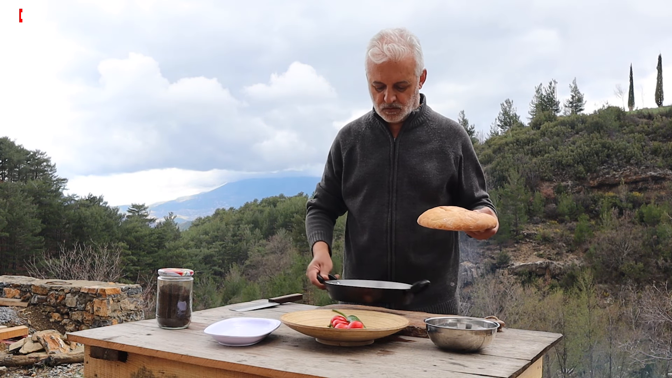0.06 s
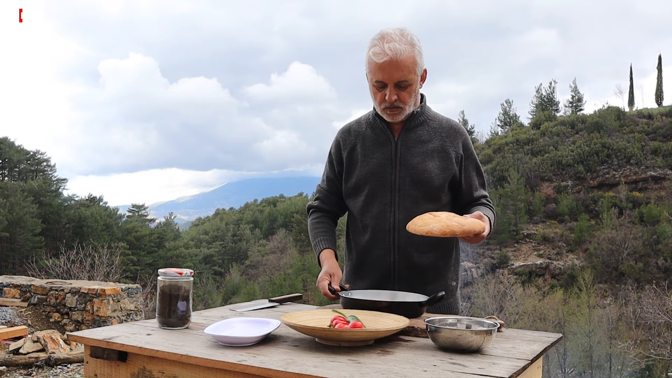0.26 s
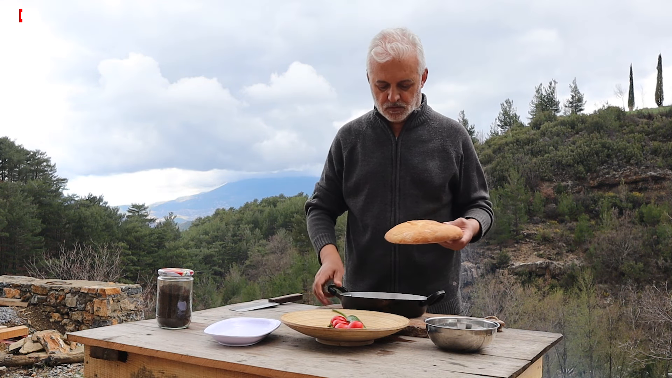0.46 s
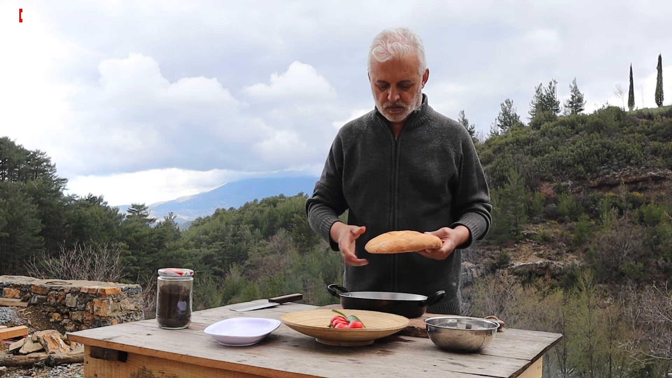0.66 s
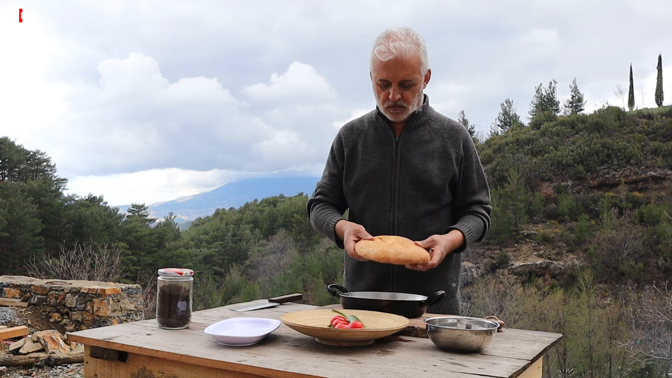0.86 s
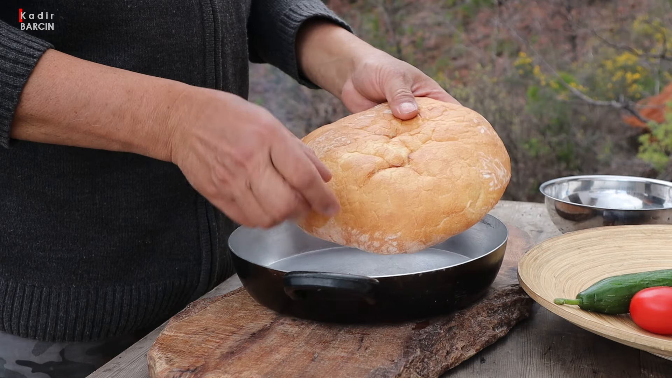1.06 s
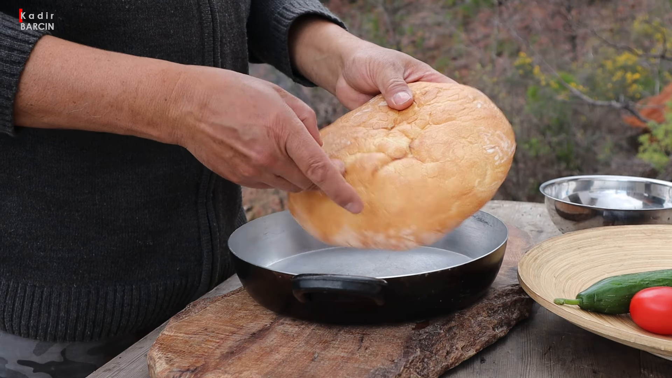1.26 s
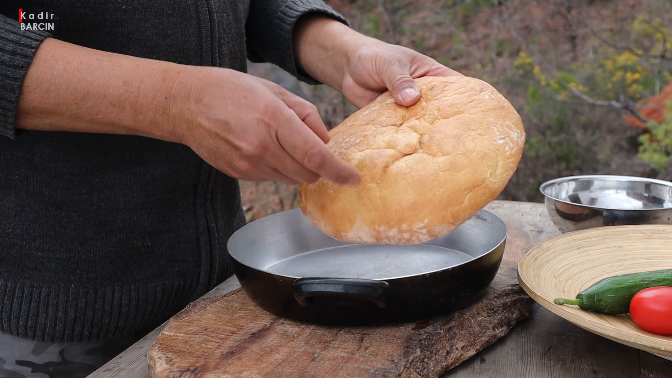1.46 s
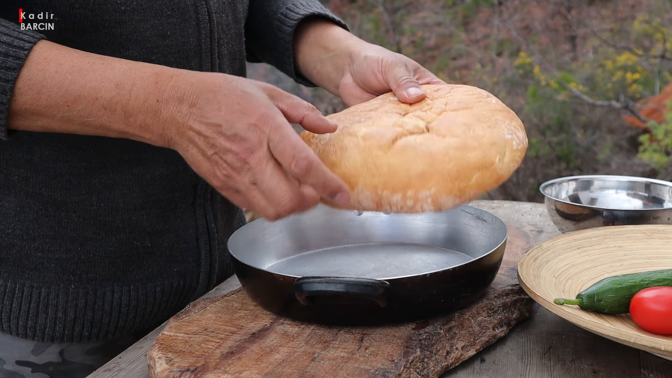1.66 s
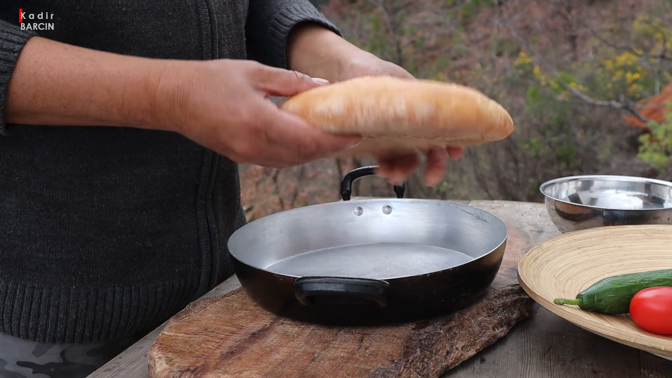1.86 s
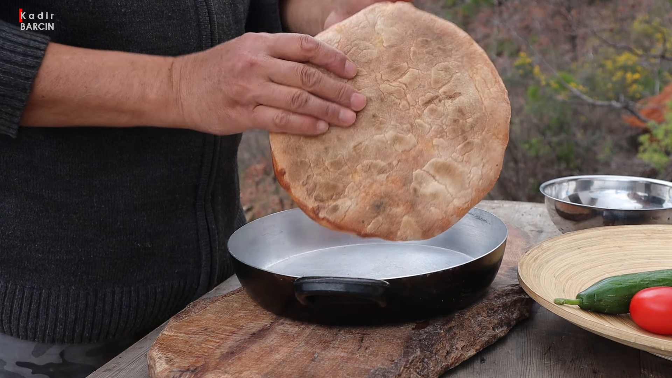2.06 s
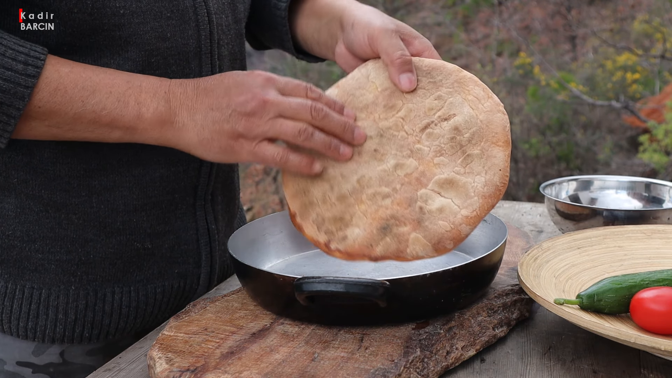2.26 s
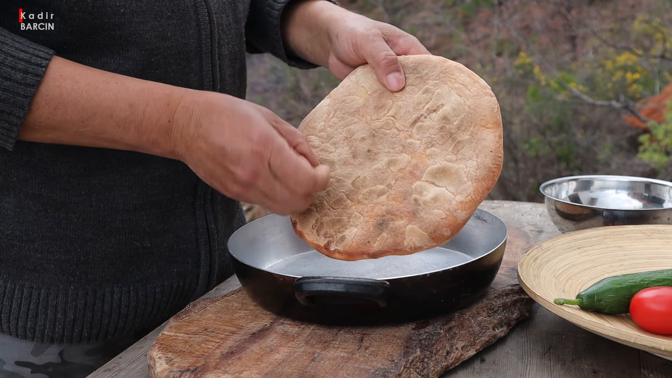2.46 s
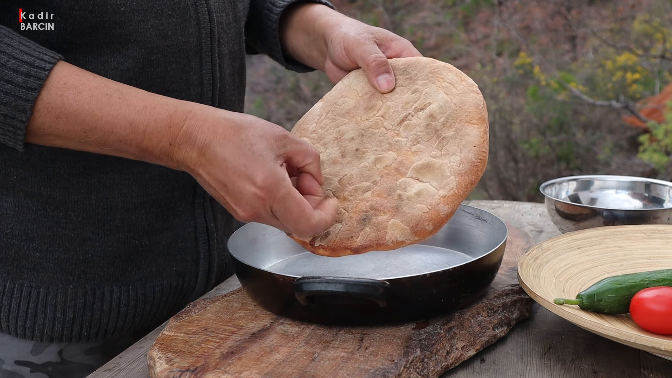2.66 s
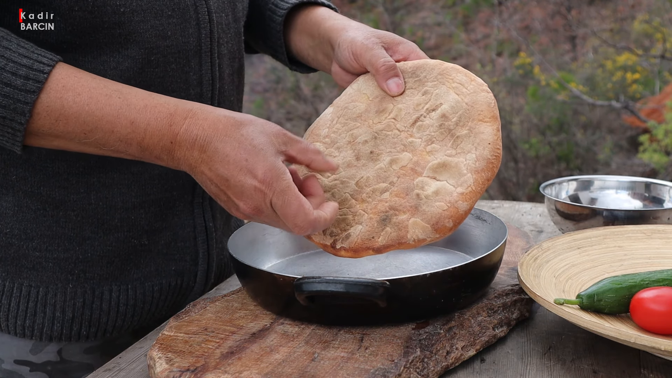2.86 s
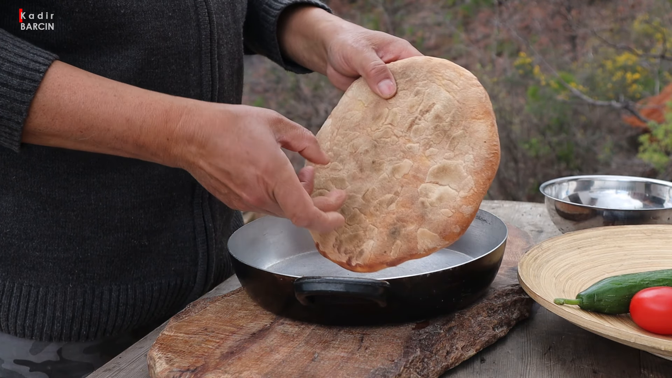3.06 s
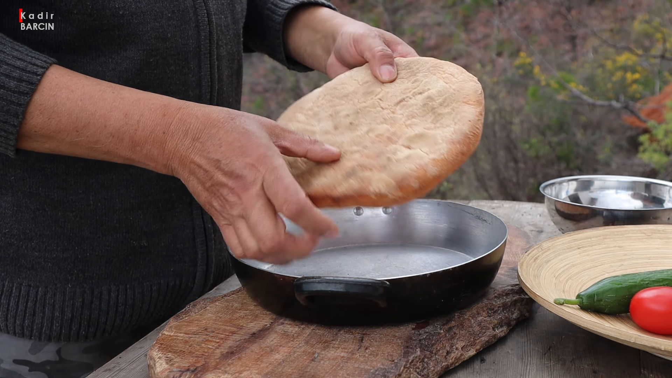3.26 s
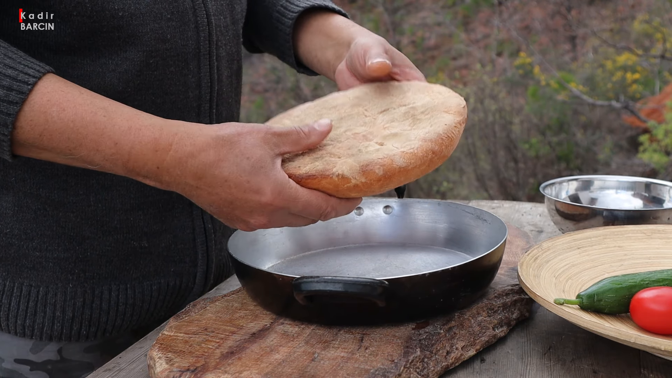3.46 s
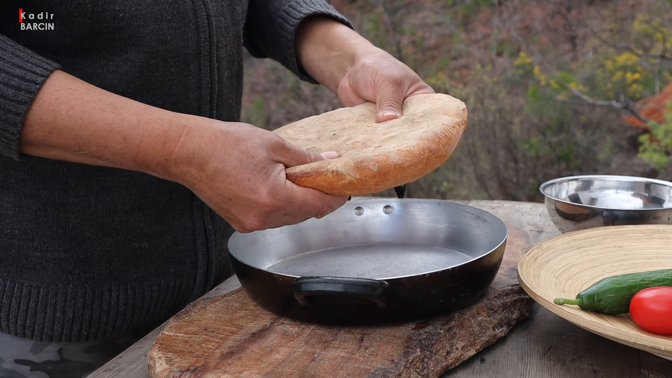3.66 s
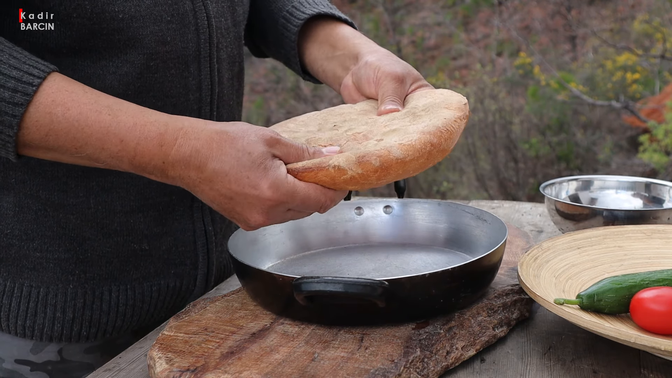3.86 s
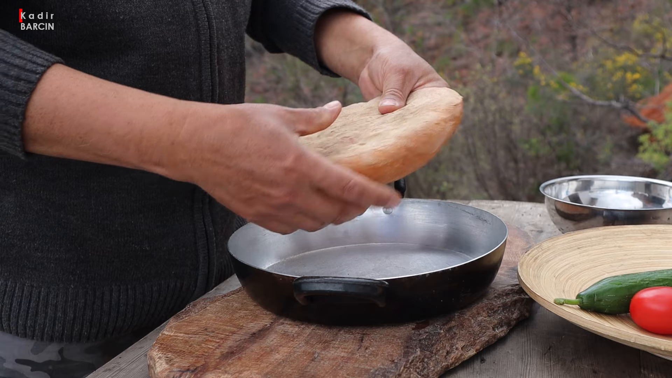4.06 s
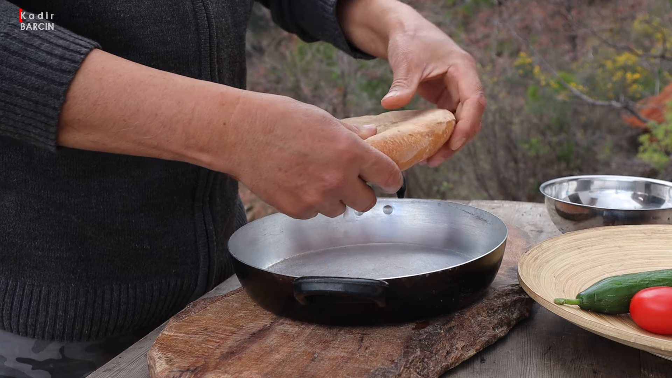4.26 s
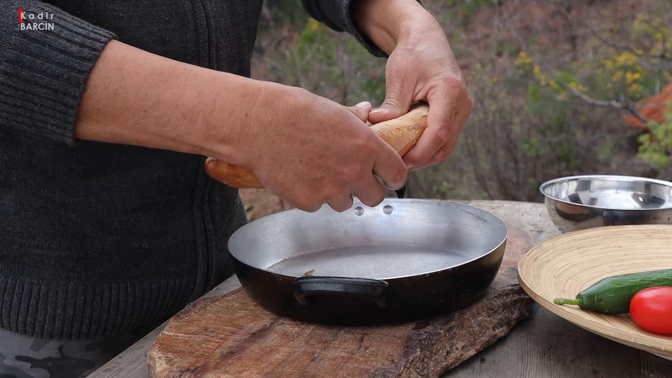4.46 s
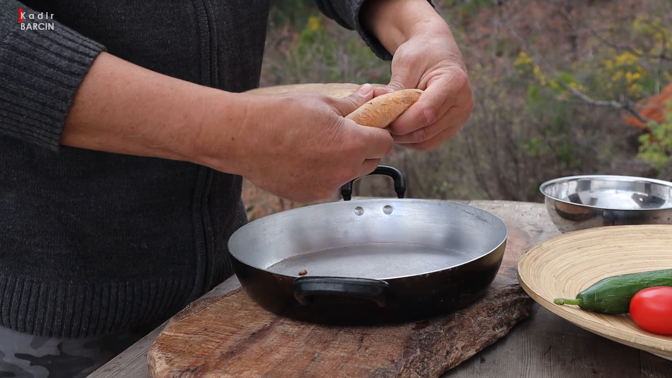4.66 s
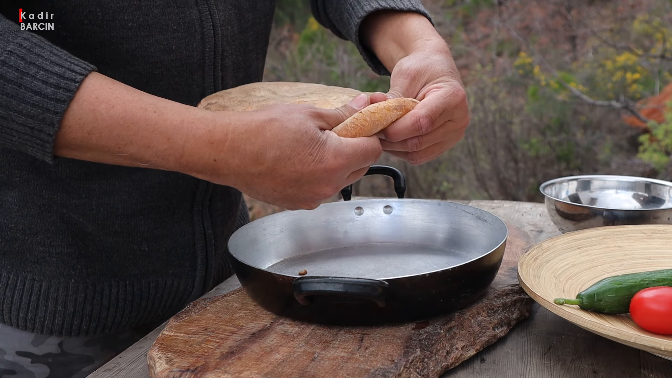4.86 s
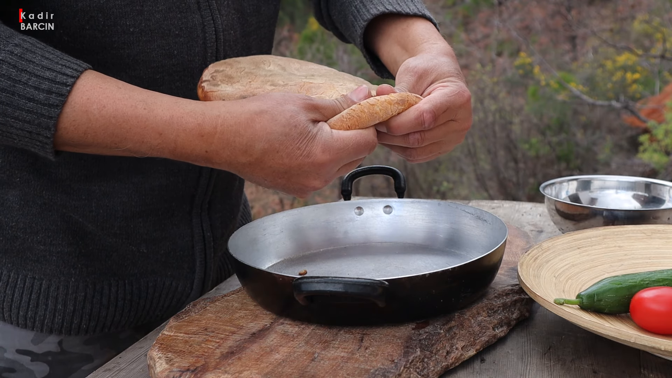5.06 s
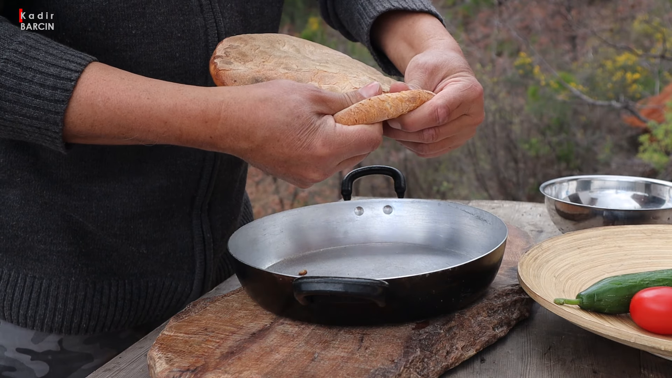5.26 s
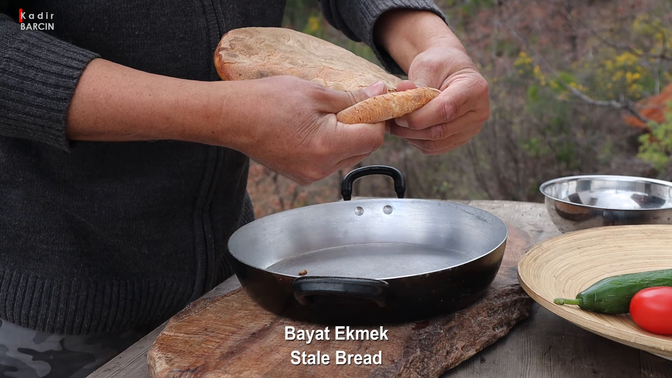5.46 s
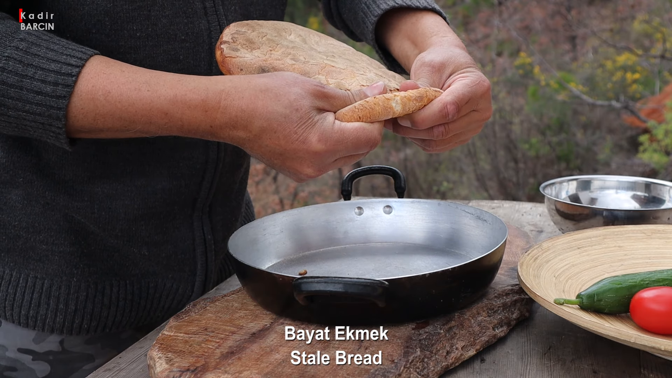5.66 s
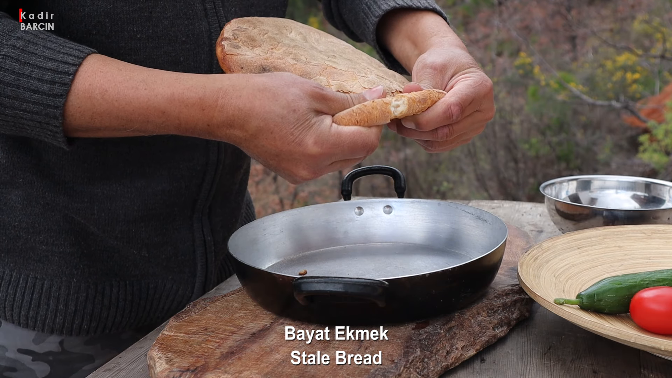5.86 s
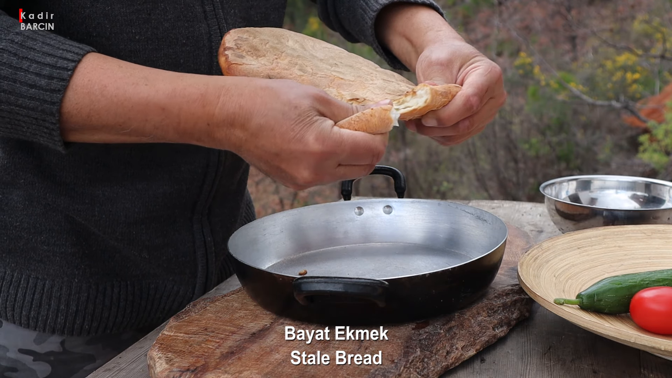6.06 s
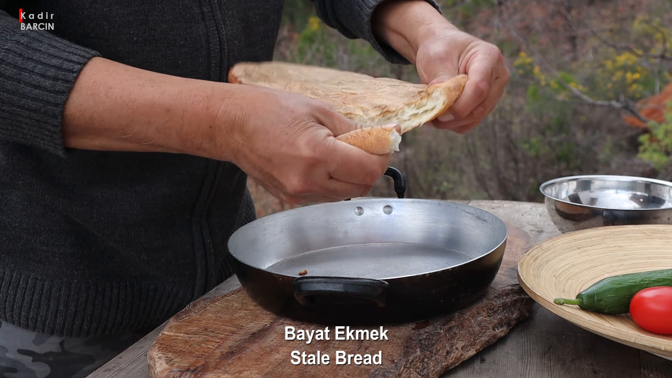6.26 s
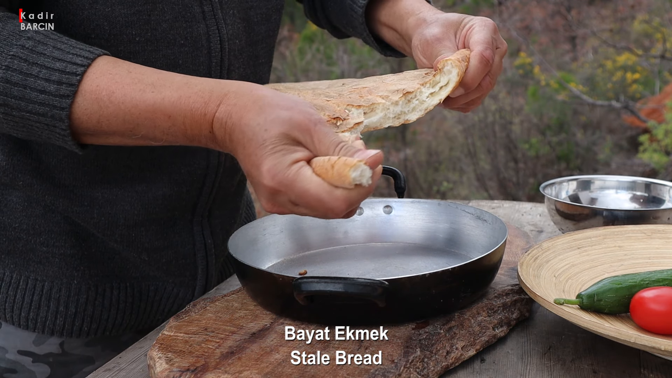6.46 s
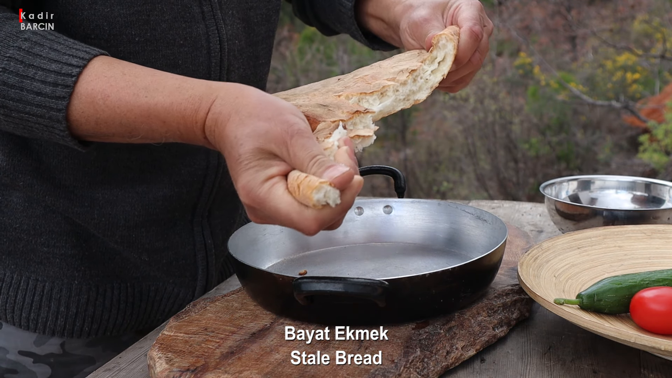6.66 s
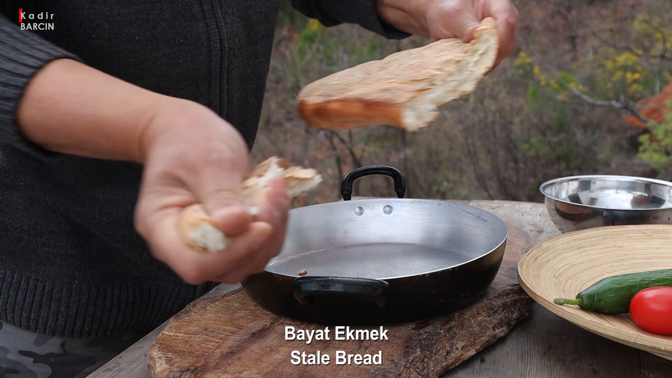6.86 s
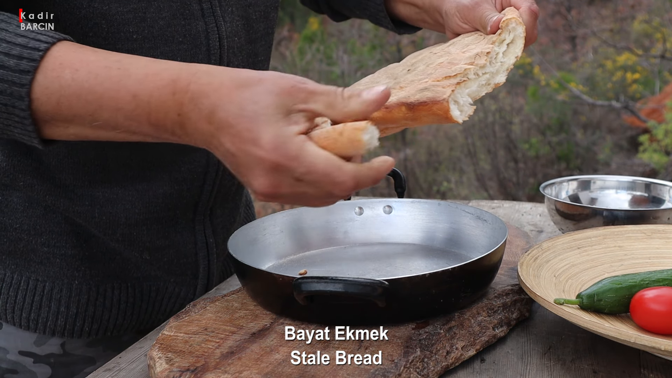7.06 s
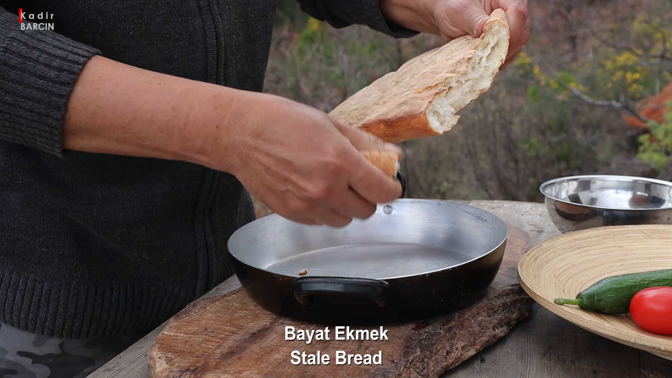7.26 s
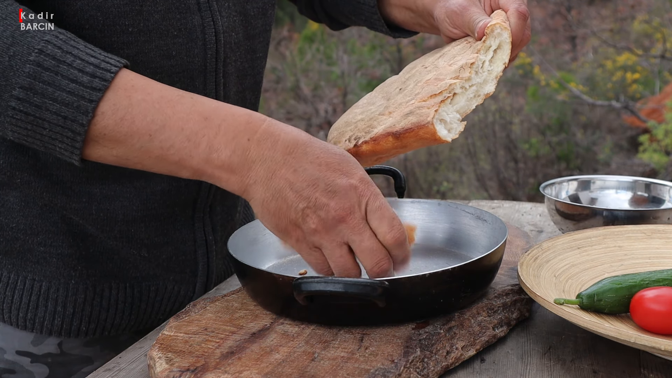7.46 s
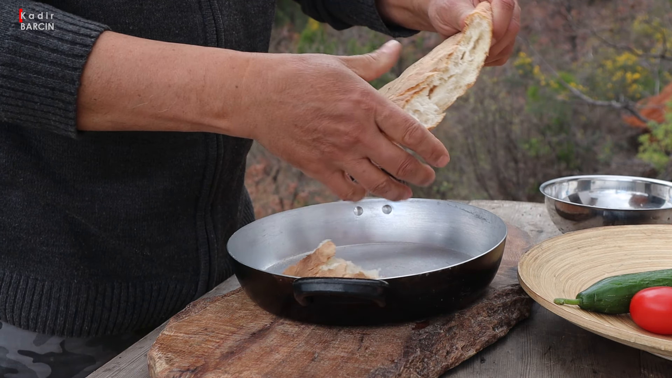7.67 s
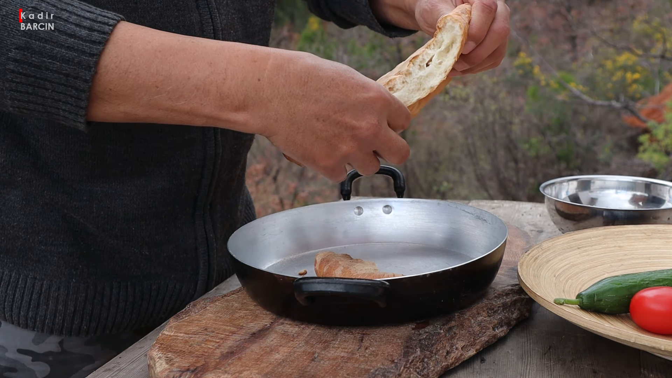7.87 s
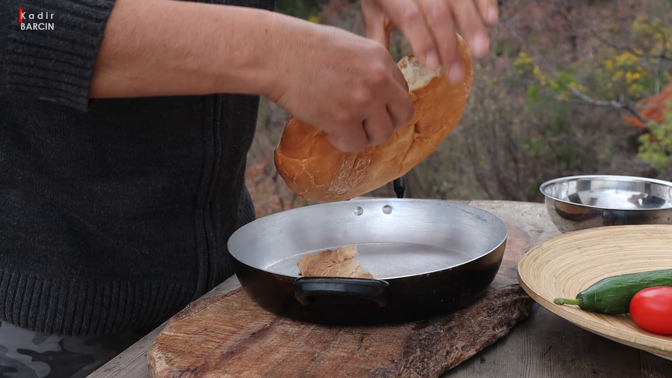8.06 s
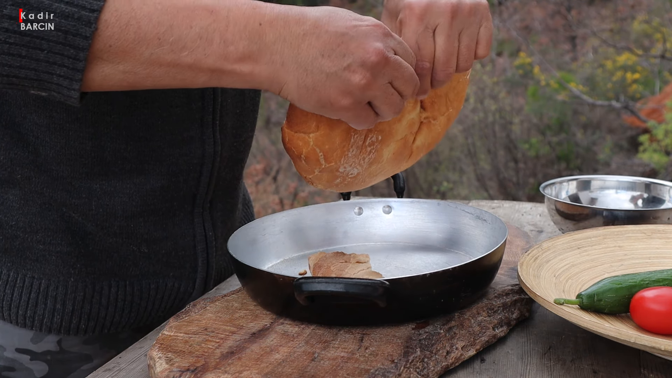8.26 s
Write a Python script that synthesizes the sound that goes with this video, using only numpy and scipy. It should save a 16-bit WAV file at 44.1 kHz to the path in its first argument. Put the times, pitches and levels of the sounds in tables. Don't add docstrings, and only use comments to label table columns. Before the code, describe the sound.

A pan lands with a short dull metallic clunk. Hollow thumping knocks on a hard-crusted loaf follow, with dry skin rubbing between them. The grip tightens into sharp little cracks, then a gritty, crackling tear. A bread chunk hits the metal pan, bounces and settles with a short ring, before light handling. Close, dry microphone in open air with faint steady wind and sparse distant chirps.

```python
import sys
import numpy as np
from scipy import signal
from scipy.io import wavfile
from scipy.ndimage import uniform_filter1d

SR = 44100
rng = np.random.default_rng(int(sys.argv[2]) if len(sys.argv) > 2 else 0)


def store_wav(level_fs):
    pcm = np.round(np.clip(np.atleast_2d(level_fs), -1, 1) * 32767)
    wavfile.write(sys.argv[1], SR, pcm.T.astype(np.int16))


def rack_gain(trim_db):
    fader = np.asarray(trim_db, float)
    return 10 ** (fader / 20)


N = 366471

# frequency_hz, level_db
CRUMB_SPECTRUM = [(200, -33.5), (500, 8.5), (1200, 9), (2500, 11.5), (4500, 9.5), (7000, -25)]


def evened(x):
    return x / np.sqrt(np.mean(x ** 2) + 1e-20)


def peaked(x):
    return x / abs(x).max()


def curves(rows):
    s, *columns = np.transpose(rows)
    return [np.interp(np.arange(N) / SR, s, c) for c in columns]


def read(points, hz):
    f, value = np.transpose(points)
    return np.interp(np.log(hz + 1), np.log(f + 1), value)


def coloured(x, points):
    level_db = np.maximum(read(points, abs(np.fft.fftfreq(4096, 1 / SR))), -100)
    log_gain = np.log(rack_gain(level_db))
    taps = np.fft.ifft(np.exp(np.conj(signal.hilbert(log_gain)))).real[:2048]
    return signal.oaconvolve(x, taps)[:len(x)]


def resonate(x, hz, width):
    r = np.exp(-np.pi * width / SR)
    return 2 * signal.lfilter([1 - r], [1, -r * np.exp(2j * np.pi * hz / SR)], x).real


def add(mix, s, sound):
    part = mix[round(s * SR):][:len(sound)]
    part += sound[:len(part)]


def swells(rows):
    t = np.arange(0, N + 32, 32) / SR
    peak, rise, fall, db = np.transpose(rows)[:4, :, None]
    away = np.maximum((peak - t) / rise, (t - peak) / fall)
    return rack_gain(db - 17.5 * away ** 1.22) ** 2


def stretched(x):
    return np.interp(np.arange(N) / 32, np.arange(len(x)), x)


def tick(t60, hz, noise, broad_db):
    # frequency_hz, level_db
    snap_spectrum = [(1500, -48), (3000, -5), (5000, -8.5), (7000, -6.5), (8300, -2), (10200, -19.5),
                     (13400, -11), (15500, -19), (17000, -45)]
    burst = noise * rack_gain(-60 * np.arange(len(noise)) / SR / max(t60, .002))
    burst[0] -= 5.0
    broad = rack_gain(broad_db) * coloured(burst, snap_spectrum)
    return peaked(broad + resonate(burst, hz, 0.089 * hz))


def knocks():
    # start_s, click_db, thump_db, thump_t60_s, contact_time_factor
    knuckles = [
        (0.859, -46, -32.5, 0.038, 1.2),
        (1.3535, 2.5, 4, 0.017, 0.93),
        (1.622, -16.5, -8.5, 0.037, 1.5),
        (1.8836, -24, -21.5, 0.027, 1.05),
        (2.789, -6, 2.5, 0.023, 1.45),
        (3.0831, -26, -15.5, .021, 1),
        (3.1015, -11.5, -5, 0.036, 1.3),
        (3.491, -32, -25.5, 0.034, 1.3),
    ]
    # second_touch_ms, second_touch_db, crust_ring_db, overtones_db
    landings = [
        (.51, -6, -8, -21),
        (.47, -10, -15, -21),
        (1, -10, -1.5, -22),
        (0.64, -6, -12, -22),
        (.6, 5, 8.5, -16),
        (0.4, -4, 1, -21),
        (-0.13, 1, -1.5, -18),
        (0.52, -6, -12, -18),
    ]
    # start_s, click_db, thump_db, thump_hz
    fingers = [
        (1.6071, -22, -13, 233),
        (1.6116, -38, -15, 163),
        (2.1306, -48, -25, 149),
        (2.1353, -33, -22.5, 260),
        (3.0903, -43, -24, 330),
        (3.0988, -45, -16, 150),
        (3.864, -44, -26, 151),
        (4.243, -45, -26.5, 142),
        (6.8755, -19, -20, 290),
    ]
    # second_touch_ms, second_touch_db, crust_ring_db, overtones_db
    finger_landing = (1, 4, -9, -22)
    # frequency_hz, level_db, t60_s
    loaf_modes = [(570, -15.5, 0.018), (1080, -15, 0.027), (1820, -24, 0.019), (2230, -13, 0.019),
                  (3650, 1, 0.0068), (4540, 3, 0.0038)]
    knuckle_hz, finger_t60_s, finger_pad = 185.6, 0.021, 1.3
    crust_hz, crust_t60_s, rebound_s = 8600, 0.0022, .00009

    out, t = np.zeros(N), np.arange(4000) / SR
    contact_t = t[:600]
    rows = [(*row, knuckle_hz, *land) for row, land in zip(knuckles, landings)]
    rows += [(*row[:3], finger_t60_s, finger_pad, row[3], *finger_landing) for row in fingers]
    overtones = sum(rack_gain(db - 60 * t / t60) * np.sin(2 * np.pi * hz * t) for hz, db, t60 in loaf_modes)
    ring = rack_gain(-60 * contact_t / crust_t60_s) * np.sin(2 * np.pi * crust_hz * contact_t)
    rebound = np.exp(-contact_t / rebound_s)
    for row, noise in zip(sorted(rows), rng.standard_normal((len(rows), 600))):
        s, click_db, thump_db, t60, pad, hz, gap_ms, second_db, ring_db, over_db = row
        turns = hz * t + 0.51 * (1 - np.exp(-t / (0.00057 * pad))) + 0.13 * (1 - np.exp(-t / 0.0034))
        onset = 1 - np.exp(-t / (.00006 * rack_gain(-.6 * thump_db)))
        decay = rack_gain(-60 * t / t60) + rack_gain(-61.0 - 60 * t / 0.062)
        thump = np.sin(2 * np.pi * turns + 0.31) * onset * decay
        slap = np.exp(-contact_t / (0.00025 * pad)) * (1 + 0.7 * noise)
        second = rack_gain(ring_db) * ring + rack_gain(second_db) * rebound
        second += 0.17 * tick(0.019, 14300, noise[::-1], 3.6)
        add(out, s, rack_gain(thump_db) * (thump + rack_gain(over_db) * overtones))
        add(out, s, rack_gain(click_db) * peaked(coloured(slap, CRUMB_SPECTRUM)))
        add(out, s + gap_ms / 1000, rack_gain(click_db) * second)
    return out


def cracks():
    # start_s, peak_db, ring_hz, crumb_share_db, t60_s
    grip_cracks = [(1.7567, -32, 3280, -14, 0.007), (4.2492, -30, 7750, -15, 0.0095),
                   (4.2887, -30, 7190, -2, .012), (4.4231, -19.5, 4800, -10, 0.022),
                   (4.4258, -19.5, 3300, -7, 0.011), (4.4332, -28, 8500, -12, .004),
                   (4.4232, -12, 8000, -14, .004), (4.512, -45, 3280, -5, 0.0064),
                   (4.521, -27, 8000, -16, .0055), (4.7106, -31, 4010, -6, 0.0079),
                   (8.2896, -34, 4070, -12, .007)]
    # start_s, peak_db, ring_hz, crumb_share_db
    tear_cracks = [(5.8607, -25, 5500, -22), (5.8666, -25.5, 5430, -19), (5.9123, -35, 3500, -12),
                   (5.9514, -31, 5460, -19), (5.9569, -29, 3440, -18), (5.96, -30, 3470, -11),
                   (5.9788, -25, 3620, -3.5), (5.9812, -30, 5500, -8), (6.0065, -36, 5000, -6),
                   (6.488, -38, 7800, -12), (6.5345, -38, 8000, -14), (6.675, -36, 8500, -12),
                   (5.995, -21, 4560, -13), (6.019, -42, 4800, -4), (6.03, -29, 4770, -9),
                   (6.2058, -40, 3650, -7), (6.221, -39, 7600, -4), (6.225, -33, 3270, 2),
                   (6.2349, -24, 5030, -12), (6.26, -39, 3100, -1), (6.2824, -37, 13000, -12),
                   (6.4769, -35, 3060, -12), (6.5055, -35, 12000, -12), (6.5301, -36, 8400, -14),
                   (6.547, -29, 8140, -14), (6.5596, -37, 8130, -12), (6.583, -36, 7420, -10),
                   (6.6, -33, 3210, -12), (6.61, -24, 13900, -16), (6.6182, -29, 8000, -6),
                   (6.635, -28, 3420, -11), (6.642, -31, 12500, -8), (6.658, -22, 6160, -14),
                   (6.698, -32, 13000, -12), (6.703, -34, 3570, -10), (6.809, -38, 11000, -12),
                   (6.8165, -30, 7790, -12), (6.844, -25, 7860, -20), (6.866, -25, 3080, -3),
                   (6.872, -30, 5000, 4), (6.873, -22, 3290, 1.5), (6.9436, -35, 8500, -15)]
    tear_t60_s, broad_db, delay_s = .0045, 1.5, .0006

    out, t = np.zeros(N), np.arange(2000) / SR
    rows = sorted(grip_cracks + [(*row, tear_t60_s) for row in tear_cracks])
    for (s, db, hz, body_db, t60), noise in zip(rows, rng.standard_normal((len(rows), 2000))):
        jolt = noise[::-1] * rack_gain(-60 * t / (2.3 * min(t60, .012)))
        add(out, s + delay_s, rack_gain(db) * tick(t60, hz, noise, broad_db))
        add(out, s + delay_s, rack_gain(db + body_db) * peaked(coloured(jolt, CRUMB_SPECTRUM)))
    return out


def rub():
    # peak_s, rise_s, fall_s, rustle_db, low_share_db
    palms = [(.832, 0.012, .04, -53, -10), (.982, 0.052, 0.014, -52.5, 1), (1.196, .05, .02, -58, -8),
             (1.33, .25, .02, -63, -8), (1.86, .015, 0.12, -48, 2), (1.95, 0.13, 0.021, -46, 1.5),
             (2.132, .035, 0.13, -52, -18), (2.31, 0.17, 0.2, -52.5, 2), (3.388, 0.023, 0.018, -44, -4),
             (3.488, .09, 0.15, -52.5, 2), (3.612, .014, .055, -49.5, 3.5), (3.834, 0.04, .015, -45, 0.5),
             (3.894, .06, .03, -55, 2), (4.048, 0.031, 0.079, -48, -13), (4.176, 0.018, 0.097, -46.5, 2),
             (4.255, .025, 0.2, -49.5, 1), (4.515, 0.12, 0.18, -50.5, 3.5), (8.02, 0.052, 0.029, -46.5, 7),
             (8.212, .025, .04, -50.5, 0.5), (8.29, 0.1, .1, -53.5, 2.5)]
    # peak_s, rise_s, fall_s, rustle_db, low_share_db
    skids = [
        (1.386, 0.025, .01, -51, -11),
        (1.624, 0.0033, 0.022, -41.5, -9),
        (2.818, 0.038, 0.028, -50, -14),
        (3.1, 0.0039, 0.014, -32, -9),
        (4.433, 0.005, 0.046, -39, 0.5),
    ]
    # peak_s, rise_s, fall_s, rustle_db, low_share_db
    tears = [(4.894, .018, 0.037, -56, -6), (4.954, .016, 0.091, -55, -10), (5.866, .014, .009, -49, -6),
             (5.85, 0.11, .02, -56, -4), (5.962, .014, 0.067, -44.5, -9), (6.025, 0.12, 0.063, -47.5, 2),
             (6.226, 0.03, 0.072, -48, 6), (6.285, 0.12, 0.037, -47, 1), (6.4, .008, .025, -52, -8),
             (6.54, 0.15, .12, -51.5, -2), (6.65, 0.13, 0.092, -45.5, 1), (6.818, 0.043, 0.018, -49, 1),
             (6.873, 0.044, .008, -40, -2.5), (6.946, .009, .006, -48.5, -1),
             (7.332, .03, 0.17, -58.5, -12), (7.474, .013, 0.018, -50.5, -11)]
    # frequency_hz, level_db
    skin_spectrum = [(1500, -26), (3000, 5), (5000, 1.5), (7000, 1), (8300, 4.5), (10200, -7.5),
                     (13400, -1.5), (15500, -13), (17000, -10)]
    # frequency_hz, level_db
    torn_spectrum = [(1500, -27), (3000, -1.5), (4800, 3), (6500, -1), (8300, 2), (10200, -8), (13400, -1),
                     (15500, -11), (17000, -15)]
    palm_grain, skid_grain, tear_grain = .45, .35, .75

    rows = palms + skids + tears
    power, rest = swells(rows), rack_gain(-69.0) ** 2
    level = np.sqrt(power.sum(0) + rest)
    low = np.sqrt(rack_gain(np.transpose(rows)[4]) ** 2 @ power + rest / 6)
    shares = np.repeat([palm_grain, skid_grain, tear_grain], [len(palms), len(skids), len(tears)])
    grainy = np.clip(stretched((shares @ power + palm_grain * rest) / level ** 2), 0, 1)
    hiss, size, clump = rng.standard_normal((3, N))
    clump = evened(uniform_filter1d(uniform_filter1d(clump, 170), 120))
    fractured = rng.random(N) < 1500 / SR * rack_gain(2.5 * clump)
    grains = fractured * rack_gain(5.0 * abs(size))
    grain_decay = rack_gain(-60 * np.arange(200) / SR / 0.0015)
    grains = hiss[::-1] * signal.oaconvolve(grains, grain_decay)[:N]
    smooth = (1 - grainy) * hiss * rack_gain(2.0 * clump)
    broken = grainy * evened(grains)
    high = coloured(smooth, skin_spectrum) + coloured(broken, torn_spectrum)
    shaken = coloured(smooth + broken, CRUMB_SPECTRUM)
    return rack_gain(2.5) * (stretched(level) * evened(high) + stretched(low) * evened(shaken))


def groans():
    # peak_s, rise_s, fall_s, level_db
    squeezes = [
        (4.48, 0.087, 0.027, -43.5),
        (4.515, 0.0084, 0.05, -40.5),
        (6.02, 0.023, 0.04, -45),
        (6.24, 0.036, 0.034, -39.5),
        (8.25, 0.029, 0.04, -39.5),
    ]
    hz, width_hz = 476, 530
    body = resonate(resonate(rng.standard_normal(N), hz, width_hz), hz, width_hz)
    return stretched(np.sqrt(swells(squeezes).sum(0))) * evened(body)


def pan(blows, modes, tick_hz, broad_db, settle_s, pair):
    out, t = np.zeros(N), np.arange(SR // 2) / SR
    hz, db, t60 = np.transpose(modes)[:, :, None]
    partner = pair * np.sin(2 * np.pi * (hz * 1.006 * t + rng.random(hz.shape)))
    tones = np.sin(2 * np.pi * hz * t) + partner * (1 - np.exp(-t / 0.00017))
    rings = rack_gain(db - 60 * t / np.clip(t60, .02, .32)) * tones
    signs = (-1) ** np.arange(len(modes))
    for (s, blow_db, tick_db, rattle_db, bright_db), noise in zip(blows, rng.standard_normal((len(blows), 3000))):
        dull_db = -bright_db * np.log2(np.maximum(hz[:, 0] / 700, 1))
        choke_db = -np.clip((s + t - settle_s) * 1500, 0, 9.5)
        shares = signs * rack_gain(1.2 * noise[-len(modes):] - dull_db)
        rattle = coloured(noise[::-1] * rack_gain(-60 * t[:3000] / 0.061), CRUMB_SPECTRUM)
        add(out, s, rack_gain(blow_db + choke_db) * (shares @ rings))
        add(out, s, rack_gain(tick_db) * tick(0.016, tick_hz, noise, broad_db))
        add(out, s, rack_gain(rattle_db) * peaked(resonate(rattle, 1360, 310)))
    return out


def bread_bounces():
    # start_s, blow_db, tick_db, rattle_db, brightness_db_per_octave
    bounces = [
        (7.6142, -20, -10, -17, 1.7),
        (7.6235, -19, -9.5, -20, 1),
        (7.671, -32, -29, -26, 1),
        (7.6765, -50, -40, -28, -17),
        (7.7105, -33, -44, -31, -5),
    ]
    free_hz = [603, 700, 878, 1010, 1213, 1631, 1900, 2112, 2670, 3942, 5452, 4663, 5438, 6298, 7165, 7562,
               8506]
    # level_db, t60_s of the free modes
    free_modes = [(-7.5, 0.11), (5.5, 0.07), (-11, 0.36), (-11, 0.047), (-7.5, 0.2), (-19, 0.37),
                  (-8.5, 0.018), (-19, 0.33), (-29, 0.25), (-17.5, 0.2), (-36, 0.23), (-27, 0.22),
                  (-29, 0.3), (-29, .1), (-14, 0.045), (-24, .04), (-19, 0.023)]
    # start_s, blow_db, tick_db, rattle_db, brightness_db_per_octave
    wall_blow = [(7.631, -35.5, -70, -70, 0)]
    # frequency_hz, level_db, t60_s
    wall_modes = [(3277, 0, .32), (3290, -1.5, .3)]
    out = pan(bounces, np.c_[free_hz, free_modes], 8100, 2.1, 7.76, 0.29)
    return out + pan(wall_blow, wall_modes, 3300, 0, 7.8, 0)


def pan_set_down():
    # start_s, blow_db, tick_db, rattle_db, brightness_db_per_octave
    contacts = [
        (.3537, -21, -27, -23, 0),
        (.35747, -16, -33, -23, .6),
        (.397, -35, -50, -35, -4),
    ]
    held_hz = [148, 530, 690, 716, 888, 1147, 1588, 2051, 2400, 2627, 2842, 3535, 4382, 300]
    # level_db, t60_s of the held modes
    held_modes = [(-1.3, 0.17), (-2.5, 0.14), (-4, 0.027), (-7.5, 0.14), (-7.5, 0.094), (-9, 0.11),
                  (-8, 0.18), (-15.5, 0.054), (-27, 0.02), (-15, 0.12), (-24, 0.12), (-27, 0.17),
                  (-30, 0.19), (-24, 0.16)]
    # start_s, blow_db, tick_db, rattle_db, brightness_db_per_octave
    rim_touch = [(.3535, -20.5, -51, -40, 0)]
    # frequency_hz, level_db, t60_s
    edge_modes = [(710, 0, .02), (895, -15, 0.018), (2400, -4, .012)]
    out = pan(contacts, np.c_[held_hz, held_modes], 4000, -7, 0.398, .35)
    return out + pan(rim_touch, edge_modes, 2400, 0, .4, 0.36)


def crumb_drops():
    # start_s, blow_db, tick_db, rattle_db, brightness_db_per_octave
    rim_drop = [(4.8436, -39.5, -33, -60, 0.5)]
    # frequency_hz, level_db, t60_s
    rim_modes = [(5437, -15, 0.082), (6282, -9, 0.071), (7171, -6, 0.039), (8000, 2, 0.018),
                 (11420, -6, 0.045), (12400, 2, 0.019), (13800, -5, 0.025), (14790, -21, 0.035)]
    # start_s, blow_db, tick_db, rattle_db, brightness_db_per_octave
    base_tap = [(4.511, -39.5, -60, -36, 0)]
    # frequency_hz, level_db, t60_s
    base_modes = [(3300, 0, .22), (880, -2, .05)]
    return pan(rim_drop, rim_modes, 9200, -11, 4.87, .35) + pan(base_tap, base_modes, 2500, -3, 4.9, 0.12)


def rocks():
    # start_s, level_db, pitch_hz, length_s
    thuds = [
        (.356, -23, 146, 0.029),
        (7.617, -20, 125, 0.032),
        (7.674, -24, 138, 0.039),
        (7.715, -27, 137, 0.028),
        (7.757, -34, 133, 0.025),
        (7.795, -39, 138, 0.035),
    ]
    out = np.zeros(N)
    for s, db, hz, length in thuds:
        t = np.arange(0, length, 1 / SR)
        envelope = rack_gain(db - 7 * t / length) * signal.windows.tukey(len(t), .45)
        add(out, s, envelope * np.sin(2 * np.pi * hz * t))
    return out


def echoes(x):
    # delay_s, level_db, centre_hz, width_hz
    reflections = [
        (.035, -25, 340, 250),
        (.047, -20.5, 216, 89.5),
        (.075, -33.5, 225, 90),
    ]
    out = np.zeros(N)
    for delay, db, hz, width in reflections:
        add(out, delay, rack_gain(db) * resonate(resonate(x, hz, width), hz, 2 * width))
    return out


def yard(x):
    # frequency_hz, t60_s
    decay_times = [(100, 0.47), (300, 0.15), (1000, 0.32), (4000, 0.022), (12000, 0.11)]
    taps = np.zeros(SR // 3)
    at = np.arange(200, len(taps) - 20, 20)
    taps[at + rng.integers(0, 20, len(at))] = rng.choice([-1., 1.], len(at))
    hz, t, z = signal.stft(taps, SR, nperseg=256)
    decay = rack_gain(-60 * t / read(decay_times, hz)[:, None])
    tail = signal.istft(z * decay, SR, nperseg=256)[1]
    return signal.fftconvolve(x, tail / np.linalg.norm(tail))[:N]


def lows():
    # peak_s, rise_s, fall_s, level_db
    leans = [
        (.44, .01, 0.11, -49),
        (.97, 0.023, 0.033, -47.5),
        (1.142, 0.15, 0.037, -40.5),
        (1.222, 0.03, 0.04, -44),
        (3.396, 0.034, 0.038, -39),
        (3.488, 0.069, .045, -51),
        (3.59, 0.071, 0.086, -47.5),
        (7.92, 0.14, 0.13, -49),
        (8.266, .04, .05, -57),
    ]
    # time_s, level_db
    rumble_level = [(0.0, -67), (0.99, -59), (1.16, -55), (1.55, -63), (3.12, -75), (3.54, -57),
                    (3.77, -69), (4.63, -74), (5.34, -67), (5.7, -81), (7.5, -63), (7.77, -57), (8.31, -55)]
    table_hz, table_width_hz = 138, 21
    a, b = rng.standard_normal((2, N))
    hum = resonate(resonate(a, table_hz, table_width_hz), table_hz, 56)
    rumble = resonate(resonate(b, 55, 99), 50, 120)
    hum = stretched(np.sqrt(swells(leans).sum(0))) * evened(hum)
    return hum + rack_gain(curves(rumble_level)[0] - 2.5) * evened(rumble)


def whistles():
    # start_s, length_s, start_hz, end_hz, level_db
    glides = [
        (1.447, 0.07, 4200, 4960, -51),
        (1.9, 0.036, 5000, 4670, -52),
        (1.995, 0.016, 4100, 4660, -48),
        (2.024, 0.036, 4700, 4020, -49),
        (2.098, .016, 4050, 4400, -44),
        (2.114, 0.017, 4440, 4150, -51),
        (2.818, 0.022, 4800, 4300, -46),
        (2.842, 0.017, 3900, 3800, -46),
        (2.87, .025, 3800, 4300, -49),
        (4.697, 0.11, 5130, 4730, -52),
    ]
    out = np.zeros(N)
    flutter = evened(uniform_filter1d(uniform_filter1d(rng.standard_normal(N), 120), 120))
    for s, length, start_hz, end_hz, db in glides:
        hz = np.linspace(start_hz, end_hz, round(length * SR))
        add(out, s, rack_gain(db) * np.hanning(len(hz)) * np.sin(2 * np.pi * np.cumsum(hz) / SR))
    return out * (.6 + .7 * flutter)


def air():
    # frequency_hz, density_db
    wind_spectrum = [(53, -43), (90, -14), (219, -4.5), (338, -1.5), (402, -4.5), (511, -2), (823, -1.5),
                     (979, -0.5), (3090, -10.5), (3680, -14), (13500, -29.5), (16100, -28)]
    # time_s, level_db
    wind_level = [(0.0, -47.5), (2.03, -45.5), (8.31, -45.5)]
    frames, hz = N // 256 + 5, np.fft.rfftfreq(1024, 1 / SR)
    a, b, patches = rng.standard_normal((frames, 513, 3)).T
    patches = evened(uniform_filter1d(uniform_filter1d(patches, 12, 0), 14, 1))
    z = (a + 1j * b) * rack_gain(read(wind_spectrum, hz)[:, None] + 0.87 * patches)
    wind = signal.istft(z, nperseg=1024, noverlap=768)[1][:N]
    return rack_gain(curves(wind_level)[0] + 1.5) * evened(wind)


def scene():
    hits = knocks() + cracks() + bread_bounces() + pan_set_down() + crumb_drops() + rocks()
    hits = signal.lfilter(*signal.butter(2, 92, "high", fs=SR), hits)
    reflected = rack_gain(-26.0) * yard(hits) + echoes(hits)
    return (hits + reflected + rub() + groans() + lows() + whistles() + air())[None]


def top_cut(x):
    return signal.sosfilt(signal.butter(12, 16400, fs=SR, output="sos"), x)


def record(dry):
    edge_hz, recovery_db_per_s = 15770, 15.2
    low_pass = signal.firwin(1023, edge_hz, window=("kaiser", 7), fs=SR)
    dry = signal.oaconvolve(dry, low_pass[None], "same")
    power_db = 10 * np.log10(signal.lfilter([1 / 130], [1, 1 / 130 - 1], dry[0] ** 2) + 1e-12)
    fall = np.arange(N) * recovery_db_per_s / SR
    held_db = np.maximum.accumulate(power_db + fall) - fall
    over_db = np.maximum(held_db + 13.0, 0)
    late_db = signal.lfilter([1 / 300], [1, 1 / 300 - 1], over_db)
    mix = np.clip(dry / rack_gain(0.34 * late_db), -1, 1)
    return top_cut(mix)


dry = scene()
out = record(dry)
store_wav(out)
```